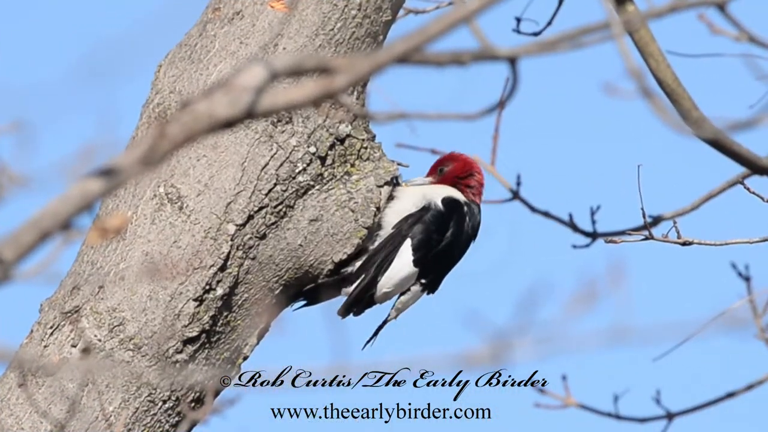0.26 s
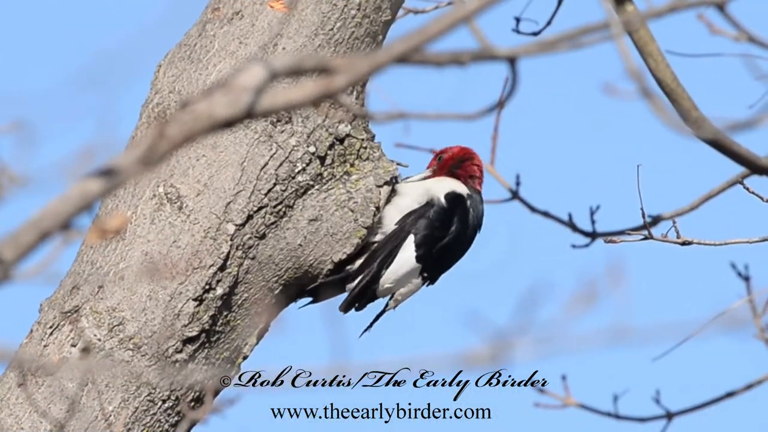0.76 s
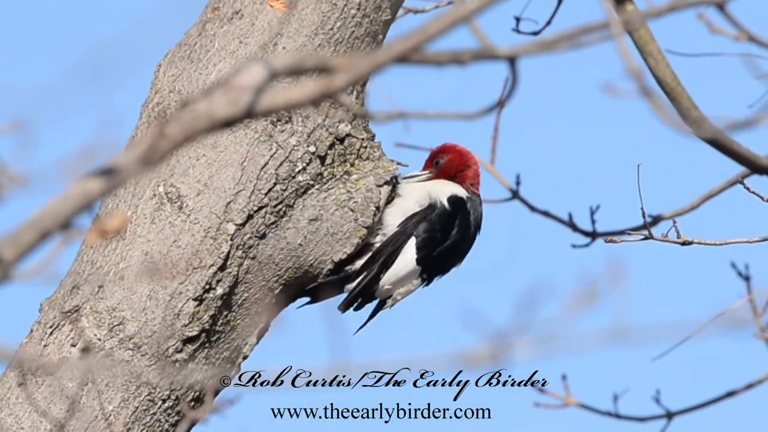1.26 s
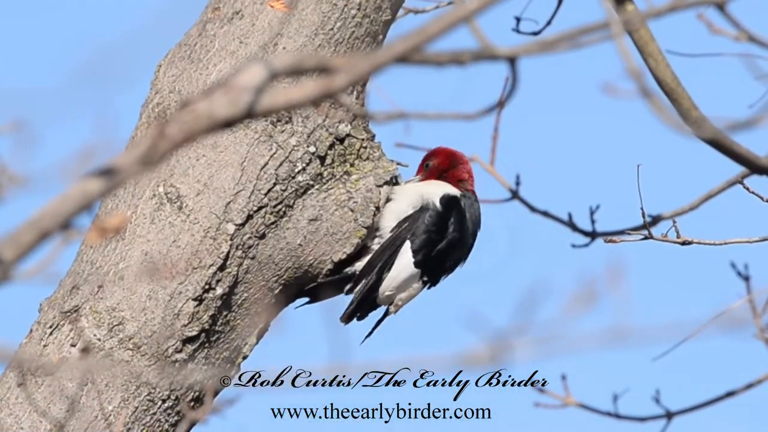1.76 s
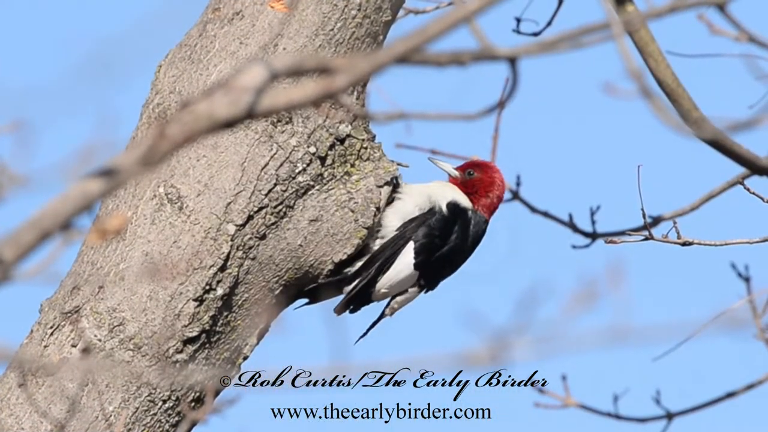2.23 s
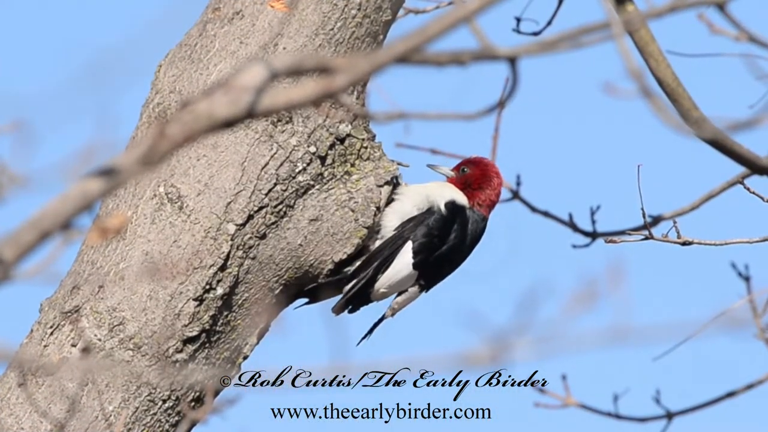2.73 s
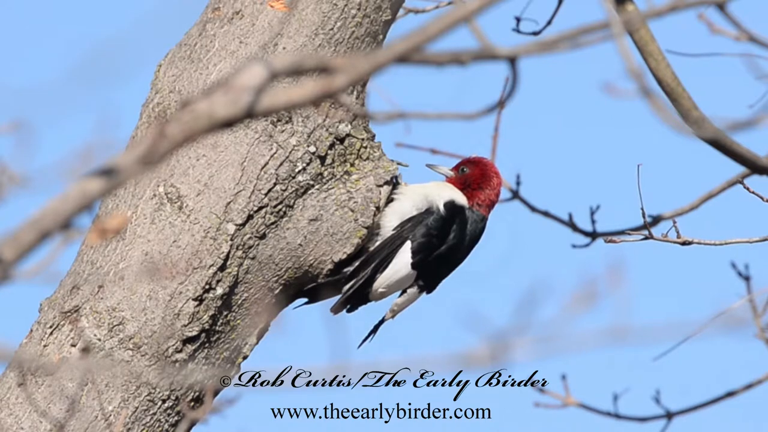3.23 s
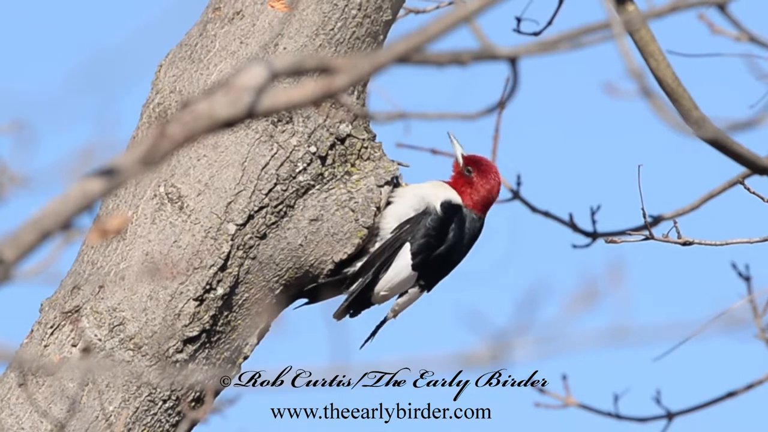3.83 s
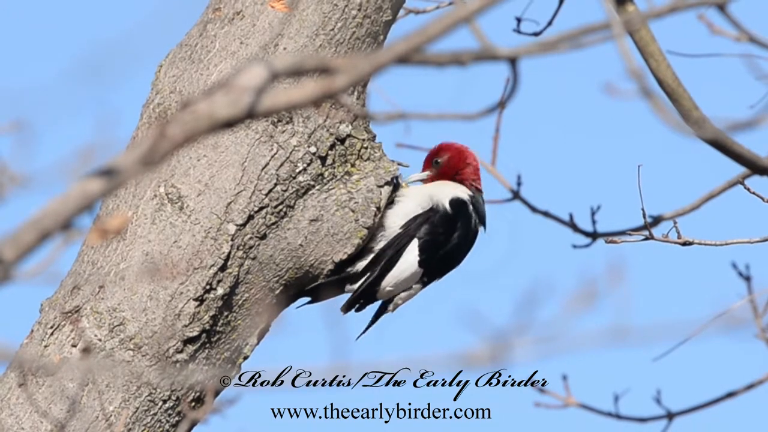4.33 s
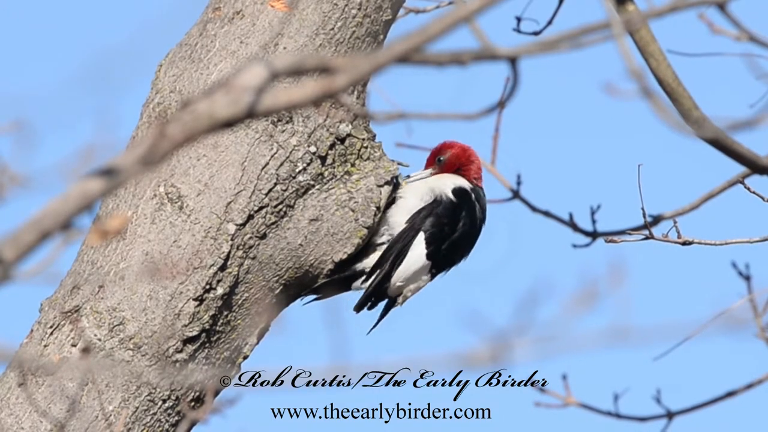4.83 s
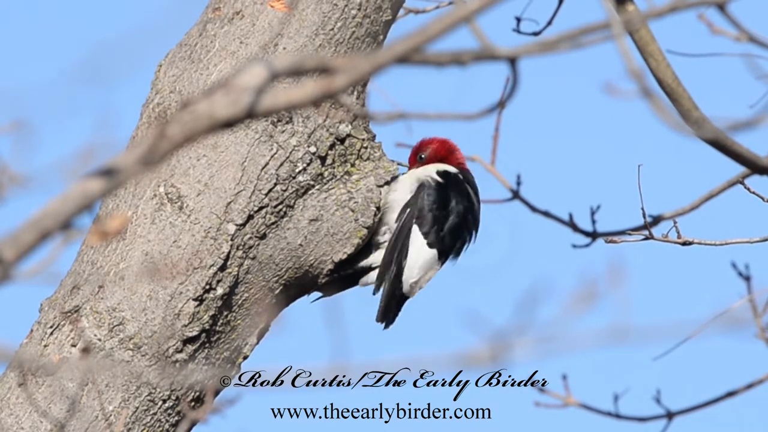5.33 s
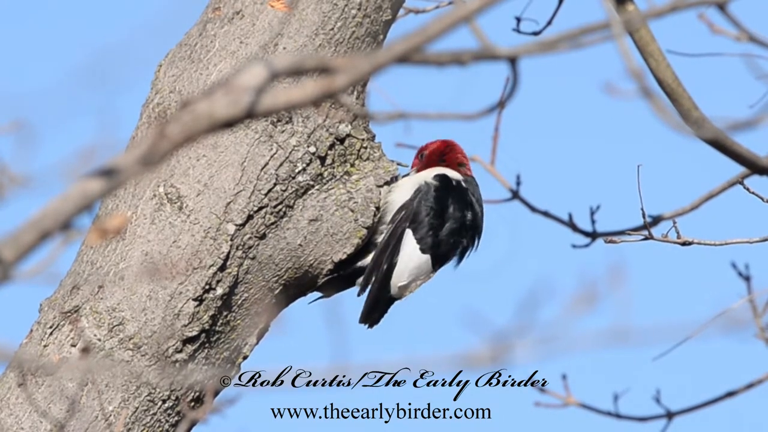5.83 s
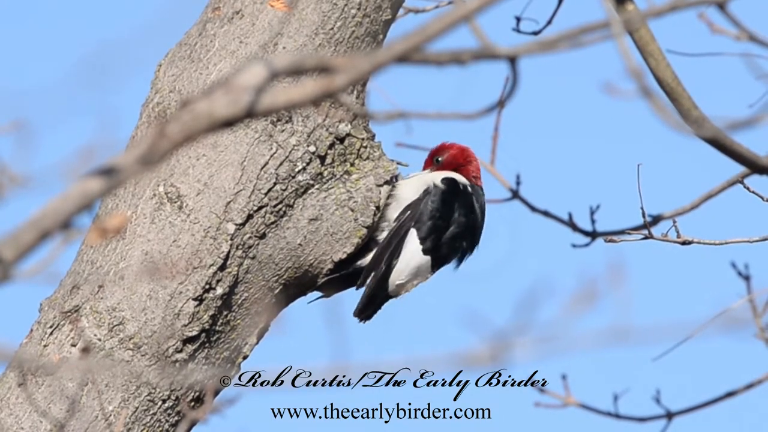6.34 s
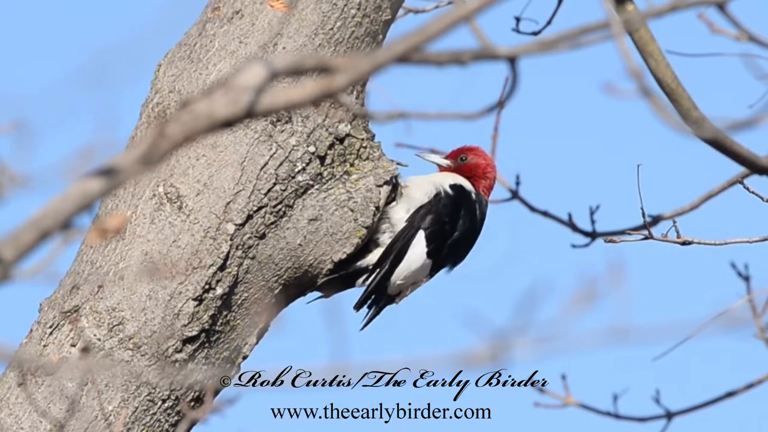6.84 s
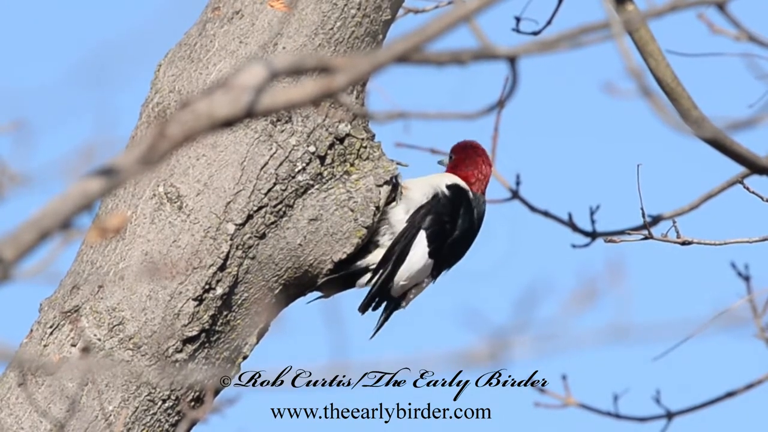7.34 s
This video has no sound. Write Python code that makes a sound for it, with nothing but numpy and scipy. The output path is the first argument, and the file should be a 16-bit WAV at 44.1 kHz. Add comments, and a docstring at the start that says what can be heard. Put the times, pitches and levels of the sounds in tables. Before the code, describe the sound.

A bright, thin mono outdoor hiss runs throughout, nearly without bass, with tiny bark ticks and a faint, extremely high electronic whine. Distant birds give weak buzzes, whistles and quick twitter, busiest in the first three seconds. A soft scrape passes at 0.6 s; a piercing near chip sounds at 1.2 s and a short crackling scrape at 1.4 s. A light tap comes at 2.7 s, then a close pair of chips around 3.2 s with another tap. Dry, papery rustling swells from about 3 s, strongest near 4.1-4.4 s, then weakens. Chips return at 4.6, 5.3 and 6.5 s, with short woodland echoes. Irregular bill clicks fall around 5.0, 5.1, 5.6, 5.9, 6.3 and 6.6 s, a few with dull woody knocks. Two softer knocks follow at 7.1 and 7.3 s as a smaller rustle rises.

```python
"""Woodpecker in a bare wood

A woodpecker picks at the bark of a bare tree: noise clicks, damped knocks of the limb and crackling scrapes.
Small birds chip nearby and twitter further off, as swept sines with a diffuse tail from the trunks.
A dry rustle, as of dead leaves in gusts, is made of swelling crackle; thin hiss and ticks lie under it all.
The sound is mono with almost no bass, and the electronics add a thin whine near their upper band limit."""
import sys
import numpy as np
from scipy import signal
from scipy.fft import rfft, irfft, next_fast_len
from scipy.io import wavfile
from scipy.ndimage import uniform_filter1d, map_coordinates

SR = 44100
rng = np.random.default_rng(int(sys.argv[2]) if len(sys.argv) > 2 else 0)


def transcribe(signal):
    """Save signal, clipped to [-1, 1], as a 16-bit WAV file at the path in sys.argv[1]."""
    frames = np.atleast_2d(signal).T
    limited = np.clip(frames, -1, 1)
    pcm = np.round(limited * 32767).astype(np.int16)
    wavfile.write(sys.argv[1], SR, pcm)


N = 334719  # length in samples

# Brief dips of the hiss. Each row: start in seconds, depth in dB, recovery in seconds.
HISS_DIPS = [(0.658, 2.4, 0.18), (2.272, 4.2, .45)]
# Relative spectra. Each row: frequency in Hz, level in dB.
HISS_SPECTRUM = [(30, -69), (200, -56), (380, -43.5), (480, -32.5), (800, -21), (1250, -7), (2000, -3.5),
                 (3000, -0.5), (4200, -2), (6000, -0.5), (9000, -1), (11500, -6), (15000, -5)]
BARK_SPECTRUM = [(300, -61.5), (1500, -20.5), (4000, -5), (6500, -2.5), (8500, -2), (11000, -9),
                 (15000, -10)]
CRISP_SPECTRUM = [(400, -93), (2500, -54), (4500, -24.5), (5400, -12.5), (6300, -5), (7400, -3.5),
                  (8300, 0.5), (9000, 1), (9900, 0.5), (10700, -4.5), (13000, -7.5), (15500, -11)]
PAPERY_SPECTRUM = [(250, -85), (500, -45), (900, -29), (1400, -13), (2400, -6), (3300, 1), (4000, -1),
                   (5000, -5.5), (8000, -16.5)]
# Decay of sound scattered among the trunks. Each row: frequency in Hz, time to fall 60 dB in seconds.
FOREST_DECAY = [(500, .4), (4000, 0.78), (12000, 0.09)]
# Distant buzzy calls, all falling alike. Each row: start in seconds, pitch in Hz, relative level in dB.
BUZZES = [(0.022, 4000, -49.5), (0.388, 5800, -46.5), (1.123, 3745, -44), (2.61, 5200, -42.5),
          (4.905, 3700, -36), (6.805, 3790, -40), (6.81, 5100, -43)]
# Distant pips, all flicking upward alike. Each row: start in seconds, pitch in Hz, relative level in dB.
PIPS = [(1.595, 2665, -41.5), (1.672, 2806, -44.5), (1.778, 2750, -41.5), (6.612, 5470, -40),
        (6.795, 4280, -37)]
# Distant thin whistles. Each row: start in seconds, length in seconds, pitch in Hz,
# pitch change as a share of the pitch, relative level in dB.
WHISTLES = [(.507, .032, 3850, 0.00055, -47), (.6, .11, 3490, -.19, -54),
            (0.777, 0.083, 3690, -0.16, -50.5), (.98, .035, 4980, -0.21, -47.5),
            (1.174, .12, 4150, -.02, -51), (1.531, 0.042, 8280, -.015, -46.5),
            (1.608, .05, 5480, -.015, -47), (1.709, 0.15, 8070, -0.023, -49.5),
            (2.407, .13, 7500, 0.087, -48.5), (3.598, .11, 4300, -.18, -46.5),
            (6.078, 0.04, 3230, -0.46, -43), (6.672, .04, 3900, 0.18, -49)]
# Runs of quick twitter. Each row: start in seconds, end in seconds, notes per second, central pitch in Hz,
# spread of pitch as a share of it, typical relative level in dB.
TWITTER_RUNS = [(1.08, 1.2, 39, 6670, 0.13, -46.5), (1.325, 1.492, 23, 3110, 0.06, -45.5),
                (1.549, 1.97, 22, 3453, .1, -50), (2.45, 2.64, 55, 2830, 0, -50),
                (2.716, 3.12, 12, 3445, 0.07, -47), (5.07, 5.156, 34, 3740, .07, -44.5),
                (5.501, 5.94, 34.4, 3476, 0.05, -44), (6.495, 6.625, 48, 4350, .065, -42)]
# Taps of the bill. Each row: start in seconds, relative click level in dB, relative knock level in dB.
TAPS = [(2.746, -33.5, -62), (3.25, -30, -44), (4.984, -27.5, -25), (5.119, -26, -65), (5.629, -32, -30.5),
        (5.856, -25.5, -59), (6.34, -25, -70), (6.635, -27, -62), (7.118, -36, -25.5), (7.276, -38, -31)]
# Scrapes on the bark. Each row: middle in seconds, half length in seconds, relative level in dB.
SCRAPES = [(0.645, 0.019, -51), (1.365, 0.0091, -36.5), (1.373, 0.029, -46), (1.75, .01, -57)]
# Typical modes of the limb. Each row: frequency in Hz, level in dB, time to fall 60 dB in seconds.
LIMB_MODES = [(1360, -7, 0.013), (1720, -1, 0.012), (2150, -6, .011), (2580, 4.5, 0.0071),
              (3700, -1.5, 0.008)]
# Near chips. Each row: start in seconds, length in seconds, glide from Hz, glide to Hz, scoop below it at
# the start in Hz, drop below it at the end in Hz, relative level in dB, loudest point 0-1, echo in dB.
CHIPS = [(1.239, 0.04, 6710, 7890, 250, -500, -17, .28, -11.5),
         (2.472, 0.05, 5470, 6410, 1090, 1100, -41, 0.3, -8),
         (3.18, 0.03, 6230, 6250, 1690, 2400, -28.5, 0.55, -13),
         (3.278, .044, 6430, 7950, 1390, 1, -18, 0.3, -14),
         (4.594, .029, 6130, 6070, 1690, 1902, -28, .5, -15),
         (5.292, .04, 6690, 7170, 403, 0, -19.5, .2, -9.5),
         (6.478, 0.033, 6720, 6950, 450, -400, -24, 0.57, -7)]
# Gusts in the dry leaves. Each row: peak in seconds, rise in seconds, fall in seconds,
# relative level of the crisp top in dB, relative level of the papery body in dB.
GUSTS = [(3.25, .21, 0.21, -30.5, -42.5), (3.71, 0.098, 0.22, -37.5, -50.5), (4.12, .34, .16, -29, -40),
         (4.4, .09, .16, -24.3, -37.8), (4.6, 0.066, 0.063, -33, -47), (4.879, 0.26, .14, -36, -44.5),
         (5.34, 0.33, 0.17, -39, -48), (5.609, 0.27, 0.24, -36.5, -44), (6.35, .5, 0.59, -51.5, -64.5),
         (6.96, 0.14, .13, -41.5, -52.5), (7.26, 0.12, 0.22, -32, -45), (7.42, 0.17, 0.31, -33, -43.5)]

AIR_DB, DIP_ATTACK_S = -48, .008  # steady level of the hiss; how fast a dip sets in
# Shared shape of a call: length in seconds, pitch change as a share of the pitch, roughness 0-1
BUZZ_S, BUZZ_GLIDE, BUZZ_ROUGH = .085, -0.19, .7
PIP_S, PIP_GLIDE, PIP_ROUGH = 0.022, .2, 0.18
WHISTLE_ROUGH = .1
# The faintest whistles: notes per second, central pitch in Hz, length in seconds, relative level in dB
CHORUS_RATE, CHORUS_HZ, CHORUS_S, CHORUS_DB = 2, 4200, .07, -56
CHORUS_SPREAD, CHORUS_GLIDE = .32, -0.2  # widest pitch offset and change within a note, shares of the pitch
TWITTER_GLIDE = 1.4  # typical bend to either side in a note, relative to the spread of pitch in its run
SCOOP_S = .0063  # time constant of the scoop into a chip and of the drop out of it
GUST_EDGE_DB, GUST_ROUNDNESS = 9, 1.51  # drop at one rise or fall time; 1 is a pointed swell, 2 a bell
BODY_FOLLOWS = 0.95  # the body swings less in dB than the top
WHINE_HZ, BAND_LIMIT_HZ = 15633.2, 15740


def amp(db):
    """The decibel law: level in dB to amplitude gain."""
    return 10 ** (np.asarray(db) / 20)


def unit(x):
    """Normalisation of power: scale to rms 1."""
    return x / np.sqrt(np.mean(x ** 2) + 1e-20)


def along(points, hz):
    """Logarithmic frequency scale: interpolate (Hz, value) points on it."""
    point_hz, values = np.transpose(points)
    return np.interp(np.log(hz + 1), np.log(point_hz + 1), values)


def wobble(rate, size=N):
    """Random modulation: a smooth curve through Gaussian knots, rate per second."""
    knots = rng.standard_normal(int(size * rate / SR) + 4)
    return map_coordinates(knots, [np.arange(size) * rate / SR])


def filtered(x, response):
    """Linear filtering: multiply the spectrum by a response of frequency."""
    size = next_fast_len(N + SR // 2)
    return irfft(rfft(x, size) * response(np.fft.rfftfreq(size, 1 / SR)), size)[:N]


def coloured(x, spectrum):
    """Spectral colouring: shape x while keeping the power of a white input."""
    return filtered(x, lambda hz: unit(amp(along(spectrum, hz))))


def patchy(x, depth_db):
    """Local modulation: small patches of time and frequency swell and fade by depth_db rms."""
    z = signal.stft(x, nperseg=512)[2]
    field = uniform_filter1d(rng.standard_normal(z.shape), 5, 0)  # smooth over frequency
    field = uniform_filter1d(field, 14, 1)  # smooth over time
    return unit(signal.istft(z * amp(depth_db * unit(field)), nperseg=512)[1][:N])


def crackle(rate, spread_db, share, life=0.00023):
    """Impulsive noise: random snaps, rate per second, carry a share of the power over steady noise."""
    sizes = amp(spread_db * np.minimum(rng.standard_normal(N), 2))
    snaps = (rng.random(N) < rate / SR) * sizes
    # the energy of each snap decays exponentially over its life in seconds
    energy = signal.lfilter([1], [1, -np.exp(-1 / (life * SR))], snaps ** 2)
    share = np.clip(share, 0, 1)
    return np.sqrt(share * energy / energy.mean() + 1 - share) * rng.standard_normal(N)


def add(track, s, sound):
    """Superposition: mix a sound into the track at time s."""
    room = track[max(round(s * SR), 0):][:len(sound)]
    room += sound[:len(room)]


def forest(x, gap=0.0022):
    """Multiple scattering: trunks and branches spread a sound into a short diffuse tail."""
    hz, t, z = signal.stft(rng.standard_normal(SR // 2), SR, nperseg=256)
    decay = amp(-60 * t / along(FOREST_DECAY, hz)[:, None])
    tail = signal.istft(z * decay, SR, nperseg=256)[1]
    t = np.arange(len(tail)) / SR
    onset = 1 - np.exp(-t / gap)
    nearest = 1 + 1.7 * np.exp(-t / 0.016)  # the nearest trunks answer first and strongest
    tail = tail * onset * nearest
    return signal.fftconvolve(x, tail / np.linalg.norm(tail))[:N]


def air():
    """Broadband noise: thin outdoor hiss with faint ticks, whose level dips briefly and recovers."""
    now = np.arange(N) / SR
    level_db = np.full(N, float(AIR_DB))
    for s, depth_db, recovery in HISS_DIPS:
        corners = [s, s + DIP_ATTACK_S, s + DIP_ATTACK_S + recovery]
        level_db -= depth_db * np.interp(now, corners, [0, 1, 0])
    hiss = patchy(crackle(rate=490, spread_db=7, share=0.043), depth_db=1.67)
    return amp(level_db) * coloured(hiss, HISS_SPECTRUM)


def picking(rate=16, tick_db=-47, tick_t60=0.013):
    """Random small impacts: bill and claws tick on the bark as decaying noise bursts, rate per second."""
    t = np.arange(SR // 50) / SR
    ticks = np.zeros(N)
    for when, softness in rng.random((int(rate * N / SR), 2)):
        envelope = amp(tick_db - 10 * softness - 60 * t / tick_t60)
        add(ticks, when * N / SR, envelope * rng.standard_normal(len(t)))
    return coloured(ticks, BARK_SPECTRUM)


def note(length, pitches, buzz):
    """Frequency modulation: a soft-edged whistle glides through three pitches; fast jitter makes it buzz."""
    u = np.linspace(0, 1, int(length * SR))
    glide_hz = np.polyval(np.polyfit([0, .5, 1], pitches, 2), u)
    hz = glide_hz * (1 + .13 * buzz * wobble(700, size=len(u)))
    swell = np.abs(np.sin(np.pi * u)) ** 0.59
    return swell * np.sin(2 * np.pi * np.cumsum(hz) / SR)


def far_notes():
    """Pitch contours of single calls: start, length, Hz, glide, dB and roughness, the faintest by chance."""
    notes = [(s, BUZZ_S, hz, BUZZ_GLIDE, db, BUZZ_ROUGH) for s, hz, db in BUZZES]
    notes += [(s, PIP_S, hz, PIP_GLIDE, db, PIP_ROUGH) for s, hz, db in PIPS]
    notes += [(*row, WHISTLE_ROUGH) for row in WHISTLES]
    for when, high, bend in rng.random((int(CHORUS_RATE * N / SR), 3)):
        hz = CHORUS_HZ * (1 + CHORUS_SPREAD * (2 * high - 1))
        notes.append((when * N / SR, CHORUS_S, hz, bend * CHORUS_GLIDE, CHORUS_DB, WHISTLE_ROUGH))
    return notes


def far_birds(direct_db=-1, echo_db=-7, syllable=0.012):
    """Direct and scattered sound: distant notes and runs of tiny glides, softened by the wood."""
    song = np.zeros(N)
    for s, length, hz, glide, db, buzz in far_notes():
        pitches = hz * (1 + glide * np.array([-.5, 0, .5]))
        add(song, s, amp(db) * note(length, pitches, buzz))
    for start, end, rate, hz, spread, db in TWITTER_RUNS:
        times = np.arange(start, end, 1 / rate)
        for s, (late, high, glide, loud) in zip(times, rng.standard_normal((len(times), 4))):
            bend = TWITTER_GLIDE * glide * np.array([-1, 0, 1])
            pitches = hz * (1 + spread * (high + bend))
            jittered = s + 2 * spread * late / rate  # wider runs are also less regular
            add(song, jittered, amp(db + 2 * loud) * note(syllable, pitches, spread))
    return amp(direct_db) * song + amp(echo_db) * forest(song)


def bill(click_t60=0.018, click_db=-6, knock_db=-5, echo_db=-14):
    """Impact, modal ringing and friction: the bill clicks on bark, knocks the damped limb and scrapes flakes."""
    bark, limb = np.zeros(N), np.zeros(N)
    t = np.arange(SR // 20) / SR
    for s, db, wood_db in TAPS:
        add(bark, s, amp(db + click_db - 60 * t / click_t60) * rng.standard_normal(len(t)))
        ring = np.zeros(len(t))
        for hz, level, t60 in LIMB_MODES:
            # each tap excites and tunes the modes a little differently
            decay = amp(level + rng.normal(0, 2.5) - 60 * t / t60)
            ring += decay * np.sin(2 * np.pi * (hz * rng.normal(1, 0.028) * t + rng.random()))
        onset = 1 - np.exp(-t / 0.00024)
        add(limb, s, amp(wood_db + knock_db) * ring * onset)
    now = np.arange(N) / SR
    stroke = sum(amp(db) * np.exp(-((now - s) / half) ** 2) for s, half, db in SCRAPES)
    bark = bark + stroke * crackle(rate=2800, spread_db=-2.0, share=0.24)
    highpass = signal.butter(4, 1000, "highpass", fs=SR, output="sos")
    direct = coloured(bark, BARK_SPECTRUM) + signal.sosfilt(highpass, limb)
    return direct + amp(echo_db) * forest(direct)


def chips(flutter_db=1.6, overtone_db=-32):
    """Harmonic frequency sweep: a small bird's sharp calls, each one whistle with a weak octave."""
    direct, scattered = np.zeros(N), np.zeros(N)
    for s, length, start_hz, end_hz, scoop_hz, drop_hz, db, crest, echo_db in CHIPS:
        u = np.linspace(0, 1, int(length * SR))
        edge = np.exp(-(u * length / SCOOP_S) ** 2)
        hz = start_hz + (end_hz - start_hz) * u - scoop_hz * edge - drop_hz * edge[::-1]
        phase = 2 * np.pi * np.cumsum(hz * (1 + 0.0071 * wobble(600, size=len(u)))) / SR
        skewed = np.interp(u, [0, np.clip(crest, .1, .9), 1], [0, .5, 1])  # put the crest in its place
        swell = np.abs(np.sin(np.pi * skewed))
        level = amp(db + flutter_db * wobble(220, size=len(u)))
        call = level * swell * (np.sin(phase) + amp(overtone_db) * np.sin(2 * phase))
        add(direct, s, call)
        add(scattered, s, amp(echo_db) * call)
    return direct + forest(scattered)


def gusts():
    """Addition of powers: overlapping swells of one shape give the gains of the top and the body."""
    now = np.arange(N) / SR
    top, body = np.zeros(N), np.zeros(N)
    for s, rise, fall, top_db, body_db in GUSTS:
        distance = np.maximum((s - now) / rise, (now - s) / fall)
        drop_db = GUST_EDGE_DB * distance ** GUST_ROUNDNESS
        top += amp(top_db - drop_db) ** 2
        body += amp(body_db - BODY_FOLLOWS * drop_db) ** 2
    return np.sqrt(top), np.sqrt(body)


def rustle(crisp_db=0, body_db=1.5):
    """Many random contacts: dry crackle merges into swells, crisp on top with a papery body."""
    top, body = gusts()
    contacts = patchy(crackle(rate=2000, spread_db=1.5, share=0.45), depth_db=1.87)
    contacts = contacts * amp(0.8 * wobble(45))
    crisp = top * amp(crisp_db) * coloured(contacts, CRISP_SPECTRUM)
    papery = body * amp(body_db) * coloured(contacts, PAPERY_SPECTRUM)
    return crisp + papery


def scene():
    """Superposition: everything reaches one microphone, whose signal feeds two equal channels."""
    mono = air() + picking() + far_birds() + bill() + chips() + rustle()
    return np.array([mono, mono])


def record(dry, whine_db=-46.0):
    """Interference and band limiting: electronics add a wavering whine and pass nothing above their limit."""
    level = amp(whine_db + .5 * wobble(6)) * np.sqrt(2)  # the dB value is an rms level
    whine = level * np.sin(2 * np.pi * WHINE_HZ * np.arange(N) / SR)
    return np.array([filtered(channel + whine, lambda hz: hz < BAND_LIMIT_HZ) for channel in dry])


dry = scene()
out = record(dry)
transcribe(out)
```